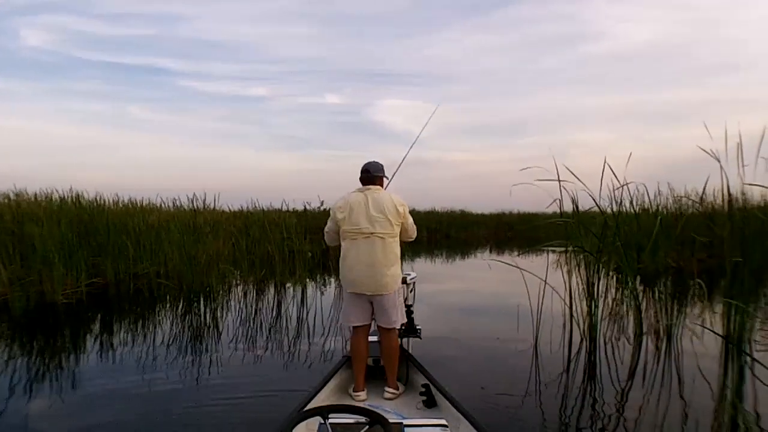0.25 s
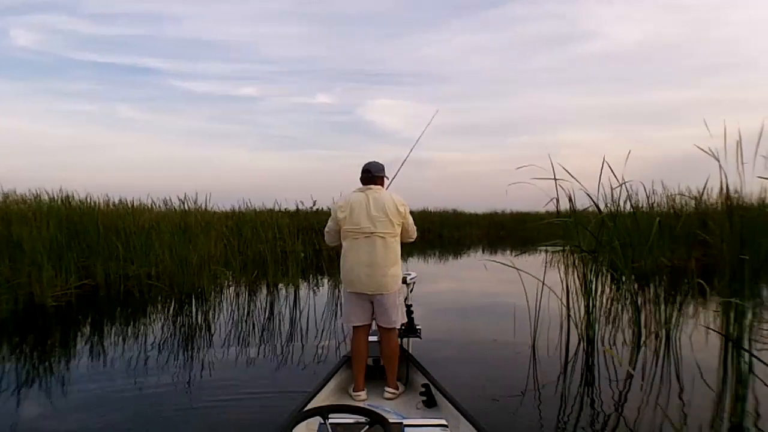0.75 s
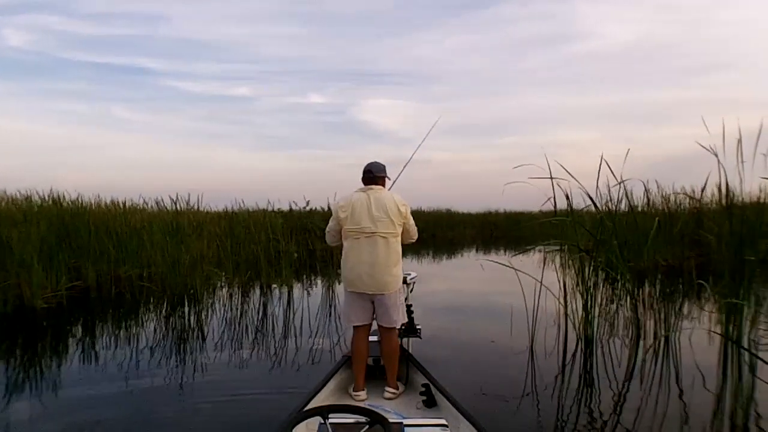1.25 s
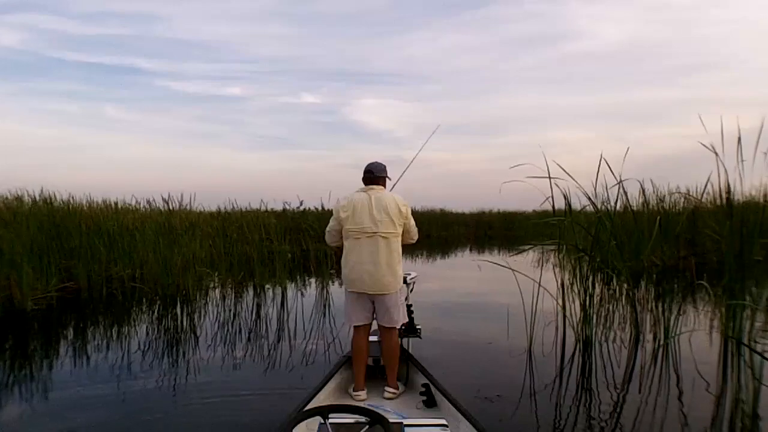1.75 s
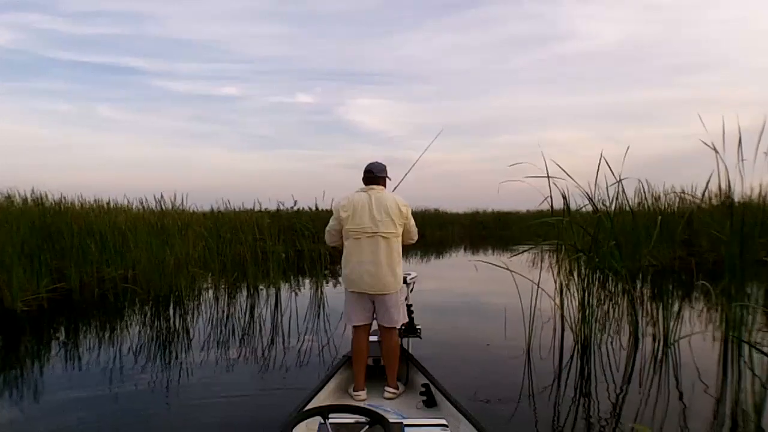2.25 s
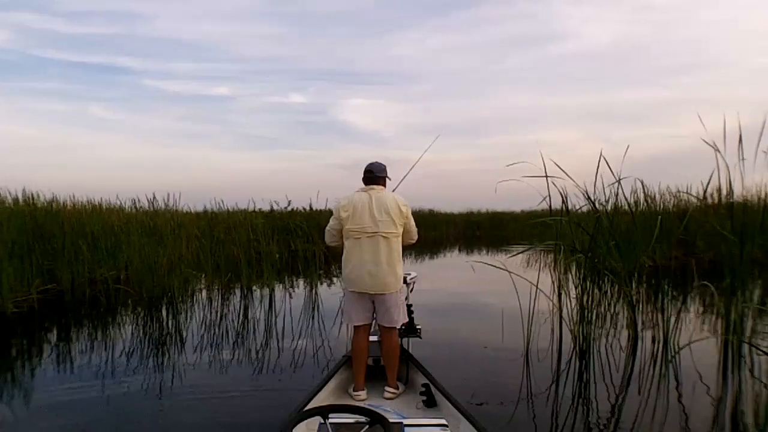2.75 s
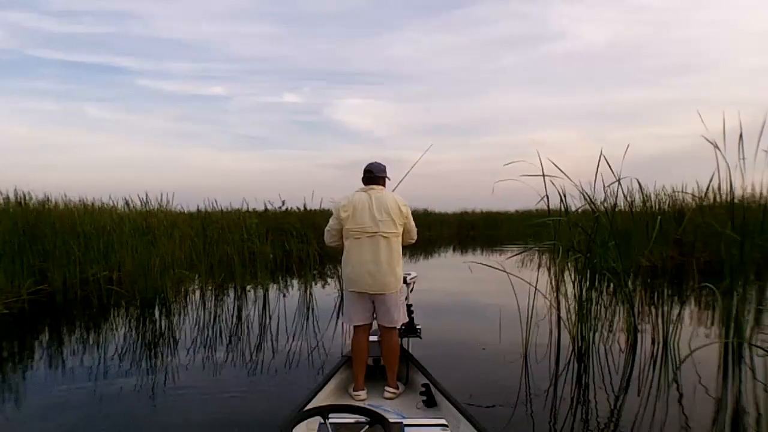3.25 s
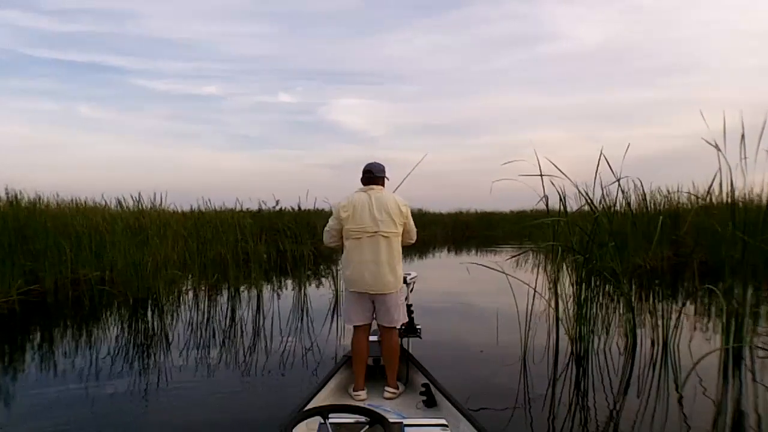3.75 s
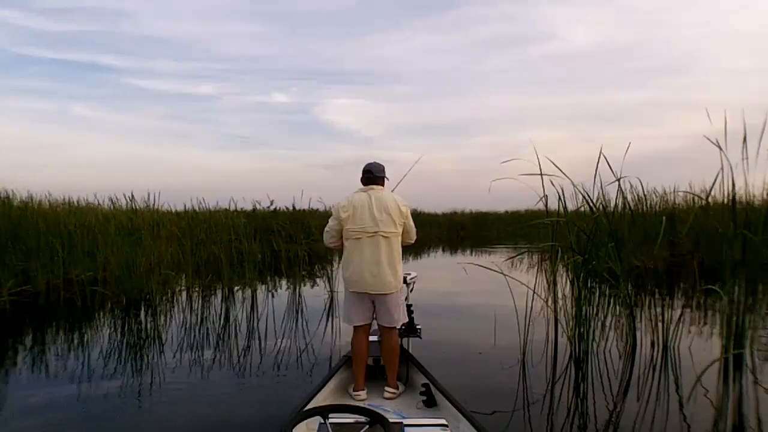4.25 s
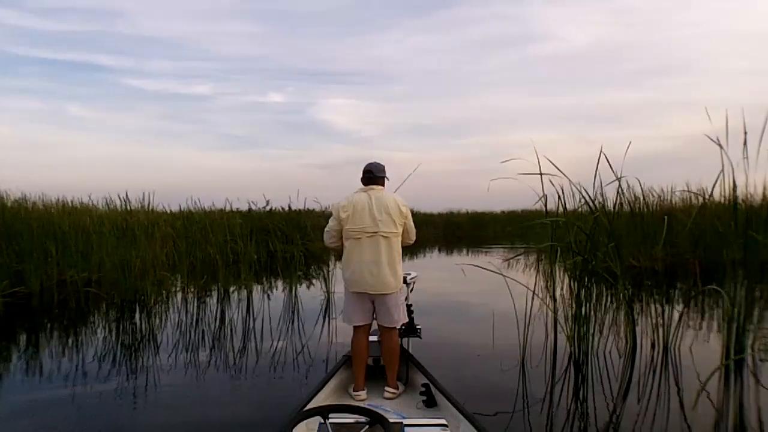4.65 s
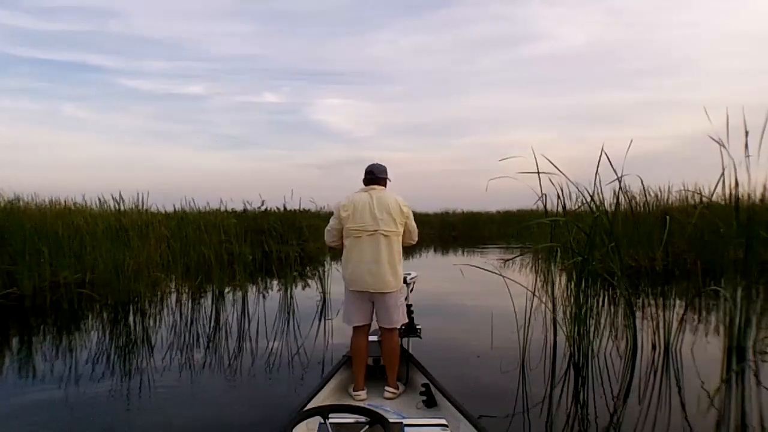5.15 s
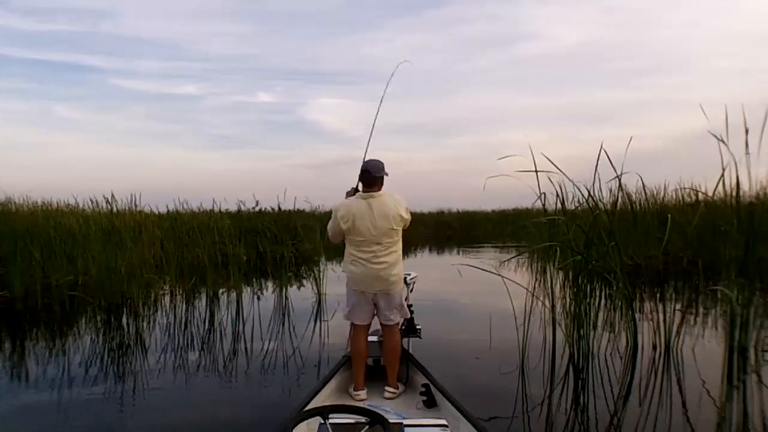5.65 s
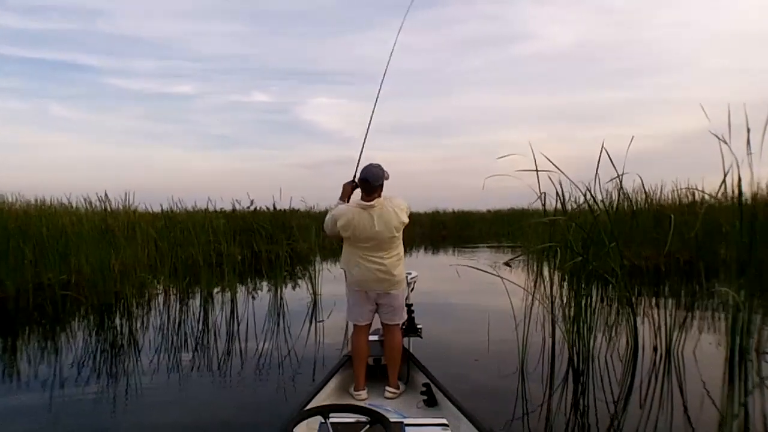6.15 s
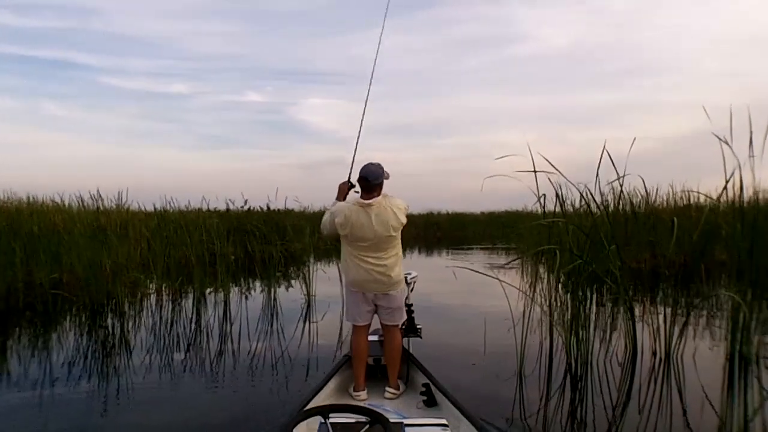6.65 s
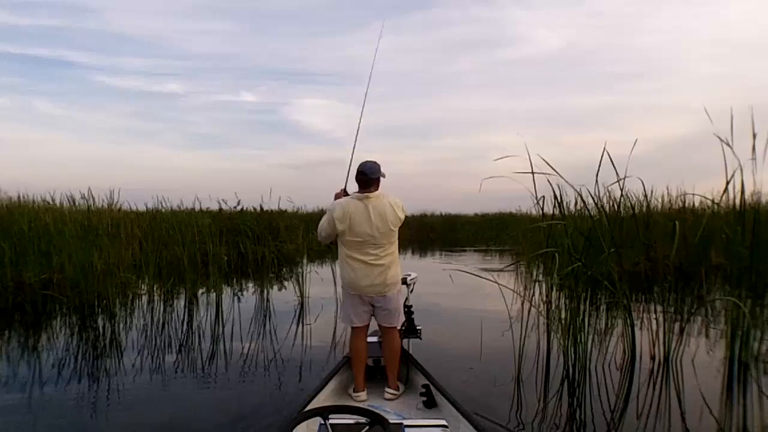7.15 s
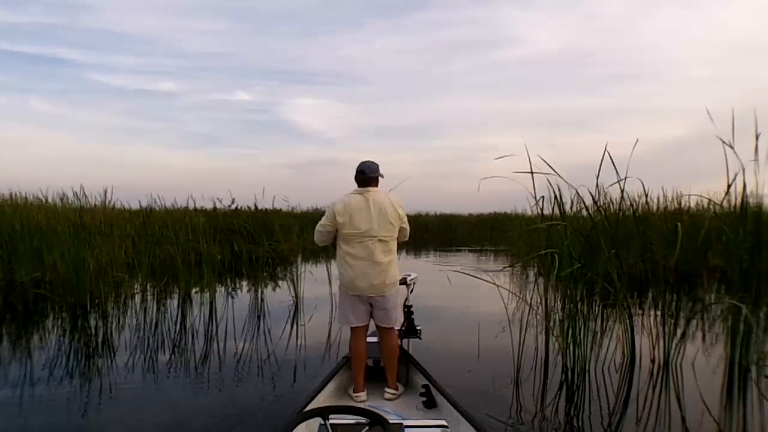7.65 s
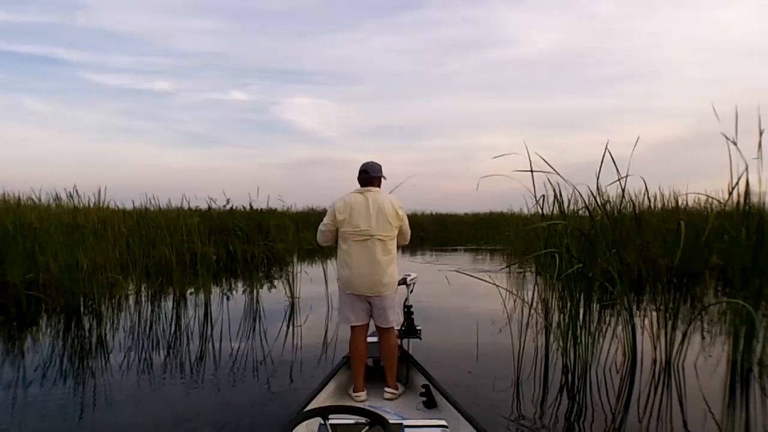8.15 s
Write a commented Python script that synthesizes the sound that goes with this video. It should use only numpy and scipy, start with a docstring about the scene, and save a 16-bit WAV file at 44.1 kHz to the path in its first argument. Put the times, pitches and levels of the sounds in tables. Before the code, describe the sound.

Soft open air hangs over a still marsh, with faint insects and a far engine drone. A small animal repeats a high, buzzy chirp in the reeds, growing louder and more frequent. Close to the microphone, something knocks on a small boat, a reel ticks and water laps gently at the hull. Later, clothes rustle, the reel gives a sharp snap, and fishing line whizzes out faintly.

```python
"""An angler winds in and casts from a small boat on a still marsh, close to a mono camera microphone.
Rod and reel click, the line whizzes out, clothes rub, and something knocks on the boat and rings it.
Below, water laps and gurgles at the hull. Off in the reeds a small animal repeats a buzzy chip that
grows louder, each one scattered by the stems. Far away are a bird, insects and an engine's drone."""
import sys
import numpy as np
from scipy import signal
from scipy.fft import rfft, irfft
from scipy.io import wavfile
from scipy.ndimage import uniform_filter1d

SR = 44100
rng = np.random.default_rng(int(sys.argv[2]) if len(sys.argv) > 2 else 0)


def digitize_waveform(pressure):
    """Quantize a signal to 16-bit integers and store it at the path in sys.argv[1].

    Rows of a 2-D input are taken as channels; values are limited to [-1, 1].
    """
    field = np.atleast_2d(pressure).T
    bounded = np.clip(field, -1, 1)
    quanta = np.round(bounded * 32767).astype(np.int16)
    wavfile.write(sys.argv[1], SR, quanta)


N = 370440
TIME, HZ = np.arange(N) / SR, np.fft.rfftfreq(N, 1 / SR)


def gain_of(db):
    """Decibels to gain."""
    return 10 ** (np.asarray(db) / 20)


def unit_rms(x):
    """Scales to rms 1."""
    return x / np.sqrt(np.mean(x ** 2) + 1e-20)


def unit_peak(x):
    """Scales to peak 1."""
    return x / abs(x).max()


def curve(points):
    """Gain at each frequency from (Hz, dB) points, joined on a log-frequency axis."""
    hz, db = np.transpose(points)
    return gain_of(np.interp(np.log(HZ + 1), np.log(hz + 1), db))


def resonance(hz, width):
    """Gain of one resonance at each frequency."""
    return 1 / (1 + (2 * (HZ - hz) / width) ** 2)


def colour(x, gain):
    """Filters by a gain at each frequency."""
    return irfft(rfft(x) * gain, N)


def noise(gain):
    """Steady noise of rms 1 with the given spectral shape."""
    return unit_rms(colour(rng.standard_normal(N), gain))


def band(x, hz, spread, order=2):
    """Band-pass from hz / spread to hz * spread."""
    return signal.sosfilt(signal.butter(order, [hz / spread, hz * spread], "band", fs=SR, output="sos"), x)


def add(mix, start, sound):
    """Lays a sound into the mix at a start in seconds."""
    part = mix[max(round(start * SR), 0):][:len(sound)]
    part += sound[:len(part)]


def envelope(start, length, attack, release):
    """Rises from start, holds until start + length, then dies away."""
    t = TIME - start
    return np.clip(t / attack, 0, 1) * np.exp(-np.maximum(t - length, 0) / release)


def decay(t, t60):
    """Falls by 60 dB in t60 seconds."""
    return np.exp(-np.log(1000) * t / t60)


def ring(t, hz, t60):
    """One dying mode."""
    return np.sin(2 * np.pi * hz * t) * decay(t, t60)


def burst(t, hz, spread, t60, order=2):
    """A dying burst of band-passed noise, peak 1."""
    return unit_peak(band(rng.standard_normal(len(t)) * decay(t, t60), hz, spread, order))


def glide(hz, width_hz):
    """A narrow, fluttering band of sound that follows a pitch curve."""
    carrier = np.exp(2j * np.pi * np.cumsum(hz) / SR)
    flutter = resonance(0, width_hz)
    return (carrier * (noise(flutter) + 1j * noise(flutter))).real


def crowd(hz, per_s, cycles, spread, size_db, hiss, rise=0):
    """A steady crowd of tiny ringing grains scattered about one pitch, over a soft hiss."""
    grains = np.zeros(N)
    for when, pitch, size in rng.random((int(per_s * N / SR) + 1, 3)):
        grain_hz = hz * spread ** (2 * pitch - 1)
        life = np.arange(0, 1, grain_hz / (SR * cycles))
        turns = cycles * life * (1 + rise * life / 2)
        # equal energy at every pitch
        shape = np.sqrt(life * grain_hz / hz) * np.exp(-np.log(100) * life) * (1 - life)
        strength = gain_of(-size_db * np.log(size + .023))
        add(grains, when * N / SR, strength * shape * np.sin(2 * np.pi * turns))
    return unit_rms(unit_rms(grains) + hiss * unit_rms(band(rng.standard_normal(N), hz, spread)))


# Open air all round the boat. Each row: frequency in Hz, relative level in dB.
MARSH_AIR = [(12, -36), (20, 0), (112, -3.5), (259, -11), (414, -16), (456, -17.5), (766, -20),
             (910, -21.5), (1280, -21.5), (1420, -23), (2820, -24), (3700, -22), (5490, -26), (6370, -22.5),
             (7200, -28.5), (9360, -86), (15800, -120)]

def marsh_air(level_db=-47.5, swell_db=1.02, low_cut_hz=27):
    """The air over the marsh swells a little with a slow breeze."""
    breeze = noise(1 / (1 + (HZ / 3) ** 4))
    low_cut = HZ ** 3 / (HZ ** 3 + low_cut_hz ** 3)
    return gain_of(level_db + swell_db * breeze) * noise(curve(MARSH_AIR) * low_cut)


# Far across the marsh, an engine and insects. Each row: centre in Hz, width in Hz, level in dB.
FAR_BANDS = [(71.2, 5.3, -56.5), (108.6, 9.2, -59.5), (173, 16, -65), (215, 10.6, -67), (950, 340, -68.5),
             (4350, 1200, -67), (6350, 460, -59.5)]

def engine_and_insects():
    """Steady bands of noise: the engine drones low, the insects sing high."""
    return sum(gain_of(db) * noise(resonance(hz, width)) for hz, width, db in FAR_BANDS)


# A distant bird. Each row: start in seconds, length in seconds, pitch in Hz, glide in Hz per second.
BIRD_NOTES = [(.67, .035, 4130, 4500), (.84, .085, 4680, -6300)]

def far_bird(level_db=-61):
    """The bird whistles one thin note up and one down."""
    out = np.zeros(N)
    for start, length, hz, slope in BIRD_NOTES:
        pitch = hz + slope * np.clip(TIME - start, 0, length)
        out += envelope(start, length, attack=.015, release=.01) * glide(pitch, width_hz=56)
    return gain_of(level_db) * out


# The animal, off in the reeds. Each row: start in seconds, level in dB, pitch in Hz.
ANIMAL_CHIPS = [(.60, -57, 3700), (1.445, -56, 3950), (2.371, -48, 4180), (3.114, -45.5, 4160),
                (3.822, -42.5, 4130), (4.358, -42.5, 4180), (4.898, -40.5, 4190), (5.438, -40, 4150),
                (5.766, -41.5, 4100), (6.353, -42, 4150), (6.908, -40, 4140), (7.175, -39.5, 4060),
                (7.674, -38.5, 4110), (7.968, -38.5, 4100), (8.336, -37, 4040)]
# Its voice's resonances. Each row: multiple of the pitch, width in Hz, relative level in dB.
ANIMAL_VOICE = [(1., 280, 3.5), (.89, 270, -3), (.81, 230, -7.5)]

def animal_chips(length_s=.032, pulse_hz=290, jitter=.25, rough=.38, lift=.014, trim_db=-.5):
    """Each chip is a short, uneven pulse train through the voice's resonances, lifting a little in pitch."""
    out, t = np.zeros(N), np.arange(2600) / SR
    for start, db, hz in ANIMAL_CHIPS:
        wander, size, rasp = rng.standard_normal((3, len(t)))
        rate = pulse_hz * (1 + jitter * unit_rms(uniform_filter1d(wander, 150)))
        onsets = np.diff(np.floor(np.cumsum(rate) / SR), prepend=-1).clip(0)
        pulses = onsets * gain_of(np.where(t > 0, 3 * size, 1))  # sizes vary after the first pulse
        drive = (unit_rms(pulses) + rough * rasp) * (t < length_s)
        voice = sum(gain_of(part_db) * unit_rms(band(drive, k * hz, 1 + width / (2 * k * hz)))
                    for k, width, part_db in ANIMAL_VOICE)
        bend = np.exp(2j * np.pi * np.cumsum(lift * hz * (t / length_s - .5)) / SR)
        chip = unit_rms((signal.hilbert(voice) * bend).real) * np.sqrt(length_s / t[-1])
        add(out, start, gain_of(db + trim_db) * chip)
    return out


def reeds(call, early_t60=.33, late_t60=1., late_db=-9, wet_db=-2.5, delay_s=.012):
    """Stems scatter the call on its way to the boat: a thick near echo and a thin long one."""
    t = np.arange(SR) / SR
    fade = decay(t, early_t60) + gain_of(late_db) * decay(t, late_t60)
    stems = rng.standard_normal(SR) * (rng.random(SR) < .1)
    echoes = stems * fade * (t > delay_s)
    return call + gain_of(wet_db) * signal.fftconvolve(call, echoes / np.linalg.norm(echoes))[:N]


# Air right at the microphone. Each row: start in seconds, length in seconds, level in dB.
AIR_PUFFS = [(5.68, .39, -39.5), (6.45, .75, -55)]

def rod_waft(gust_hz=12):
    """Lifting and swinging the rod stirs a low waft on the microphone."""
    stir = sum(gain_of(db) * envelope(start, length, attack=.2, release=.09)
               for start, length, db in AIR_PUFFS)
    return stir * noise((HZ / gust_hz) ** 2 / (1 + (HZ / gust_hz) ** 4))


# Down at the waterline. Each row: start in seconds, length in seconds, level in dB, centre in Hz.
HULL_WASHES = [(.86, .28, -52, 180), (2.54, .3, -53.5, 300), (3.97, .14, -53.5, 360)]

def washes(spread=1.4):
    """Water pushes softly against the hull: a low murmur."""
    out = np.zeros(N)
    for start, length, db, hz in HULL_WASHES:
        murmur = unit_rms(band(rng.standard_normal(N), hz, spread))
        out += gain_of(db) * envelope(start, length, attack=.03, release=.06) * murmur
    return out


# Water close alongside as the boat rocks. Each row: crest time in seconds, level in dB,
# building and dying times in seconds, bubble pitch in Hz.
HULL_SLOSHES = [(.865, -51, .02, .04, 910), (3.72, -48.2, .2, .37, 1120), (4.68, -50.8, .035, .44, 1380),
                (6.355, -44, .13, .1, 1550), (6.73, -44.5, .1, .16, 1750)]

def gurgles(spray_db=-5.5, spray_hz=3500):
    """Each slosh is a loose crowd of small bubbles that rise in pitch; droplets tick above them."""
    bubbles, water = np.zeros(N), np.zeros(N)
    for crest, db, building, dying, hz in HULL_SLOSHES:
        surge = gain_of(db) * np.exp(np.minimum((TIME - crest) / building, (crest - TIME) / dying))
        bubbles += surge * crowd(hz, per_s=220, cycles=14, spread=1.9, size_db=3.5, hiss=.5, rise=.1)
        water += surge
    spray = water * crowd(spray_hz, per_s=70, cycles=10, spread=1.45, size_db=3.8, hiss=.4)
    return bubbles + gain_of(spray_db) * spray


# Laps just under the hull. Each row: start in seconds, level in dB, pitch in Hz, t60 in seconds.
HULL_LAPS = [(1.755, -43, 900, .08), (2.993, -32.5, 423, .057), (2.994, -33.5, 600, .035),
             (3.683, -28.5, 1140, .03), (3.686, -32, 1640, .03), (3.697, -20, 770, .016),
             (4.759, -36.5, 815, .031), (5.882, -31.5, 109, .23), (5.884, -38, 483, .049),
             (6.086, -39, 278, .19), (6.355, -32.5, 630, .034), (6.653, -28, 930, .017)]

def laps(rise=.34, attack_s=.0012):
    """Each lap traps a pocket of air that rings and rises a little in pitch."""
    out, t = np.zeros(N), np.arange(SR // 4) / SR
    for start, db, hz, t60 in HULL_LAPS:
        add(out, start, gain_of(db) * ring(t, hz * (1 + rise * t), t60) * (1 - np.exp(-t / attack_s)))
    return out


# One knock on the boat, close by. Each row: contact time in seconds, relative level in dB.
KNOCK_CONTACTS = [(1.6305, 1.5), (1.6314, -4), (1.6325, 3)]
# The boat's modes. Each row: frequency in Hz, relative level in dB, t60 in seconds.
BOAT_MODES = [(651, -20, .18), (759, -17, .19), (880, -13, .07), (1022, -9, .125), (1150, -19, .06),
              (1515, -16, .09), (1705, -2, .04), (1841, -8, .04), (2003, -14, .04), (2080, -11, .04),
              (2532, -9, .055), (2788, -2, .05), (3075, -8, .035), (3505, -11, .05), (3767, 3, .034),
              (4060, 2, .02), (4617, -9, .05), (5064, -6, .028)]

def knock(crack_db=-14, ring_db=-21, rattle_db=-28, rattle_hz=1600, low_cut_hz=430):
    """Quick contacts crack; the boat rings and rattles briefly after them, with little bass."""
    out, t = np.zeros(N), np.arange(SR // 3) / SR
    for start, db in KNOCK_CONTACTS:
        add(out, start, gain_of(db + crack_db) * burst(t, hz=3900, spread=1.23, t60=.0048))
    # neighbouring modes swing in opposite directions
    modes = sum((-1) ** k * gain_of(db) * ring(t, hz, t60) for k, (hz, db, t60) in enumerate(BOAT_MODES))
    rattle = unit_rms(band(rng.standard_normal(len(t)), rattle_hz, spread=2, order=4)) * decay(t, t60=.07)
    add(out, KNOCK_CONTACTS[1][0], gain_of(ring_db) * modes + gain_of(rattle_db) * rattle)
    return signal.sosfilt(signal.butter(3, low_cut_hz, "high", fs=SR, output="sos"), out)


# The angler's arm, near the microphone. Each row: fastest moment in seconds, half length in seconds,
# level in dB.
ARM_STROKES = [(2.386, .026, -40.8), (4.665, .024, -45), (5.545, .032, -46.8), (6.352, .034, -38.7),
               (6.55, .08, -47), (6.686, .028, -35), (6.785, .027, -42), (7.118, .013, -43)]
# The colour that all rubs share. Each row: frequency in Hz, gain in dB.
RUB_SPECTRUM = [(500, 8), (1900, -2.5), (2300, -5), (2650, -1), (3300, 0), (4000, 3), (4650, 5),
                (5400, 0.5), (6600, 1.5), (8000, -6), (12000, -30)]

def rubs(trim_db=-.5, soft_hz=2250, soft_db=-5.5, hard_hz=3300, brighten=.2, steepness=1.65):
    """Cloth and line rub in a dense crowd of tiny slips; the faster the arm, the brighter they are."""
    speed = np.sqrt(sum(gain_of(db) ** 2 / (1 + ((TIME - fastest) / half) ** 2) ** steepness
                        for fastest, half, db in ARM_STROKES))
    soft, hard = (crowd(hz, per_s=500, cycles=16, spread=1.9, size_db=2.3, hiss=.85)
                  for hz in (soft_hz, hard_hz))
    slips = speed * (gain_of(soft_db) * soft + (speed / speed.max()) ** brighten * hard)
    return gain_of(trim_db) * colour(slips, curve(RUB_SPECTRUM))


# Winding in, close up. Each row: start in seconds, length in seconds, level in dB.
REEL_TURNS = [(1.87, .05, -55), (2.04, .11, -53), (2.54, .11, -48.5), (2.69, .08, -47.3)]
# The reel body's resonances. Each row: centre in Hz, width in Hz, relative level in dB.
REEL_BODY = [(2550, 400, -7), (3200, 450, -5), (4500, 1000, -3)]

def reel(ticks_per_s=1600, size_db=2.5):
    """While the reel turns, a rasp of fine ticks rings its body."""
    ticks = (rng.random(N) < ticks_per_s / SR) * gain_of(size_db * rng.standard_normal(N))
    body = sum(gain_of(db) * resonance(hz, width) for hz, width, db in REEL_BODY)
    turning = sum(gain_of(db) * envelope(start, length, attack=.02, release=.03)
                  for start, length, db in REEL_TURNS)
    return turning * unit_rms(colour(ticks, body))


def cast(start=7.06, length=.29, level_db=-47.5, top_hz=5900, slowing_s=.275, fade_db_per_s=13):
    """The line whizzes off the spool, falling in pitch and level as it slows."""
    t = np.maximum(TIME - start, 0)
    level = gain_of(level_db - fade_db_per_s * t) * envelope(start, length, attack=.04, release=.025)
    return level * glide(top_hz * np.exp(-t / slowing_s), width_hz=1150)


# Rod and reel, close to the microphone. Each row: start in seconds, level in dB, centre in Hz.
TACKLE_CLICKS = [(.850, -34.5, 1500), (1.3331, -28.5, 2620), (2.198, -35, 3800), (2.242, -37.5, 3300),
                 (2.7595, -29.5, 3700), (3.273, -33.5, 3400), (3.683, -30.5, 3400), (3.9635, -33, 3000),
                 (4.631, -28, 3100), (4.7563, -30, 2000), (5.148, -35.5, 3400), (6.074, -28.5, 2900),
                 (6.219, -30.5, 2000), (6.4628, -11, 3600), (6.471, -11.5, 3300), (6.518, -25, 3080),
                 (6.6935, -23, 3800), (6.8107, -18.5, 4070), (7.043, -37, 3500), (7.50, -36, 2400),
                 (8.258, -32, 3820)]

def tackle_clicks(trim_db=-.7, edge_db=-15, thud_db=-19.5, hardest_t60=.012, t60_s_per_db=.001):
    """Small hard parts snap: hard snaps are short and bright, soft ones longer with more deck thud."""
    out, t = np.zeros(N), np.arange(SR // 12) / SR
    hardest_db = max(db for _, db, _ in TACKLE_CLICKS)
    for start, db, hz in TACKLE_CLICKS:
        softer_db = hardest_db - db
        snap = burst(t, hz, spread=1.54, t60=hardest_t60 + t60_s_per_db * softer_db, order=3)
        edge = gain_of(edge_db - 1.1 * softer_db) * burst(t, hz=10500, spread=1.11, t60=.01)
        thud = gain_of(thud_db + .55 * softer_db) * burst(t, hz=1150, spread=1.9, t60=.05)
        add(out, start, gain_of(db + trim_db) * (snap + edge + thud))
    return out


def scene():
    """The marsh, the water and the angler as heard from the boat, the same in both channels."""
    marsh = marsh_air() + engine_and_insects() + far_bird() + reeds(animal_chips())
    water = washes() + gurgles() + laps()
    aboard = rod_waft() + knock() + rubs() + reel() + cast() + tackle_clicks()
    mono = marsh + water + aboard
    return np.array([mono, mono])


# The camera microphone's own hiss. Each row: frequency in Hz, relative level in dB.
MIC_HISS = [(4820, -28), (8200, -0.5), (8750, 3.5), (11300, 1.5), (14700, -6.5), (15300, -7.5)]
# Its response, deaf in a notch at 8 kHz. Each row: frequency in Hz, gain in dB.
MIC_RESPONSE = [(20, 0), (6700, 0.5), (7200, -4.5), (7600, -21), (8000, -72.5), (8250, -7.5), (16000, 6)]

def record(dry, hiss_db=-57, top_hz=15350):
    """The camera microphone adds its hiss and colour, then cuts off the highest treble."""
    hiss = gain_of(hiss_db) * noise(curve(MIC_HISS))
    coloured = colour(dry + hiss, curve(MIC_RESPONSE))
    low_pass = signal.firwin(511, top_hz, window=("kaiser", 9), fs=SR)
    return signal.oaconvolve(coloured, low_pass[None], "same")


dry = scene()
out = record(dry)
digitize_waveform(out)
```